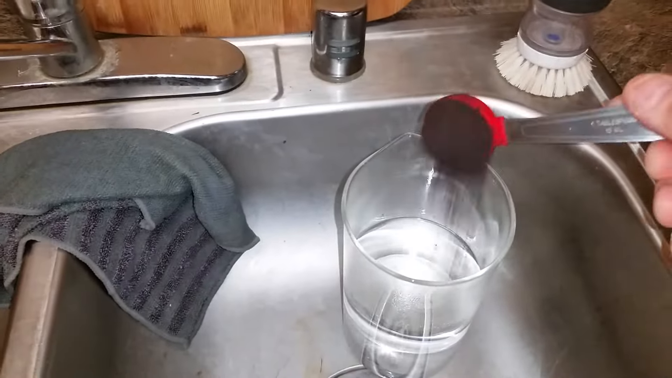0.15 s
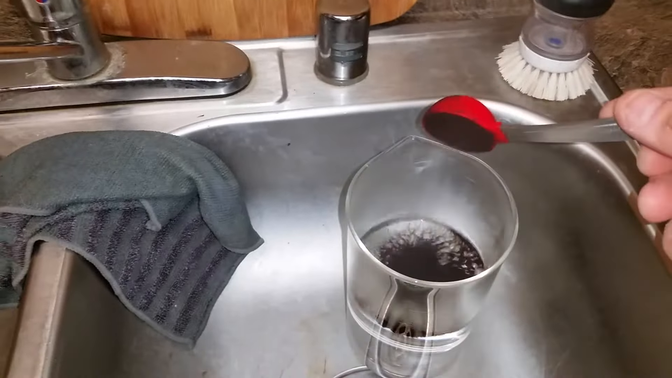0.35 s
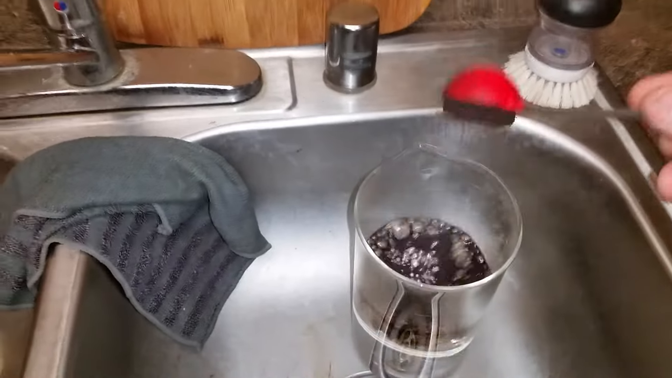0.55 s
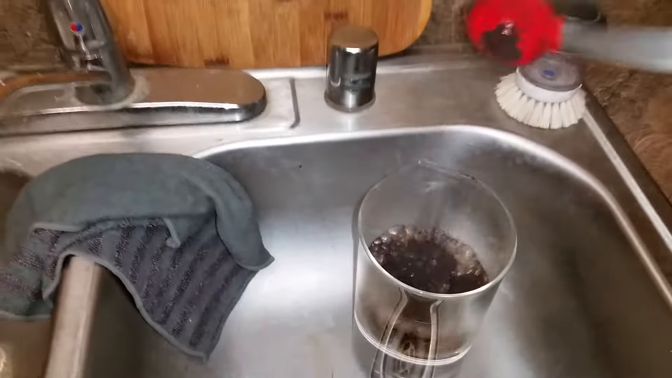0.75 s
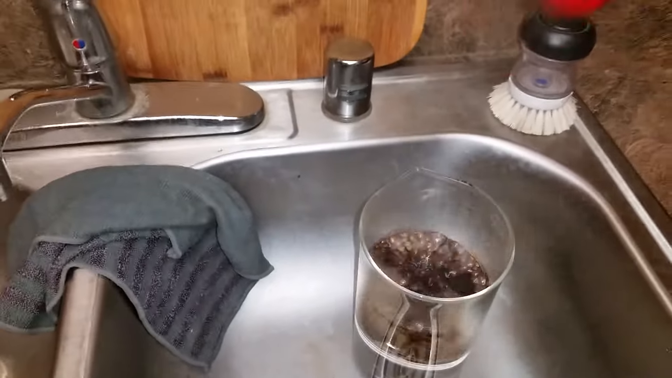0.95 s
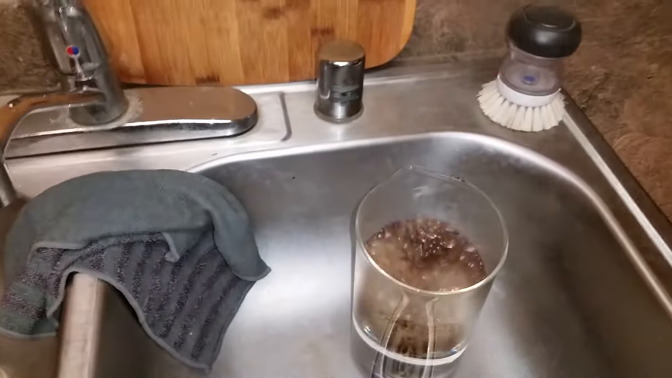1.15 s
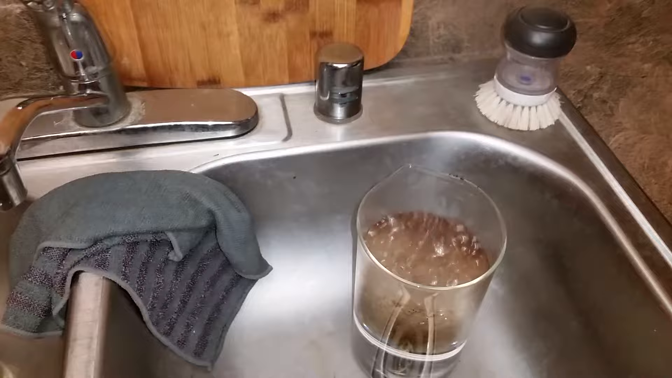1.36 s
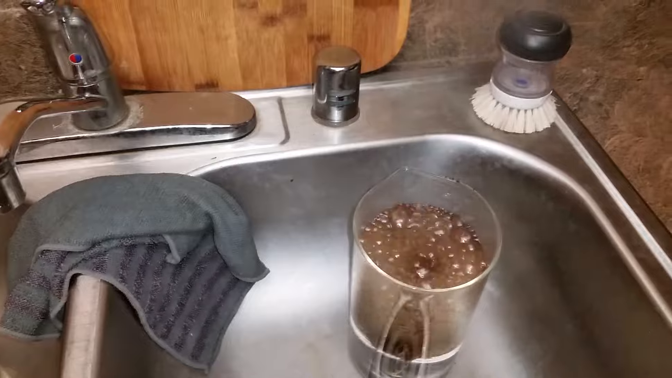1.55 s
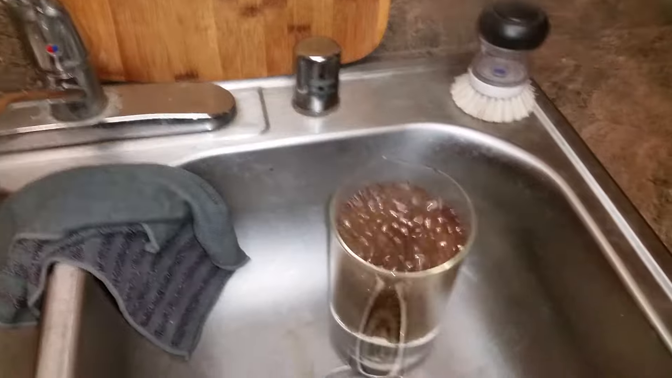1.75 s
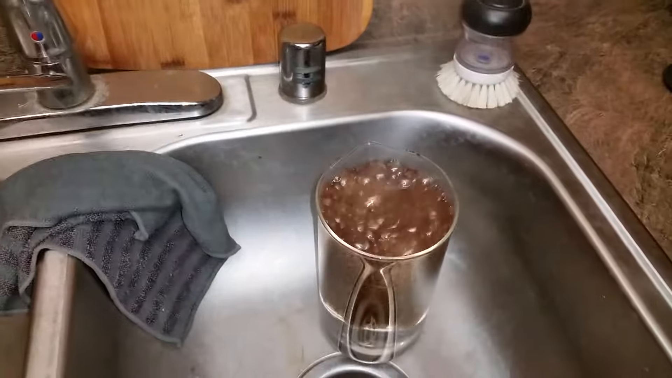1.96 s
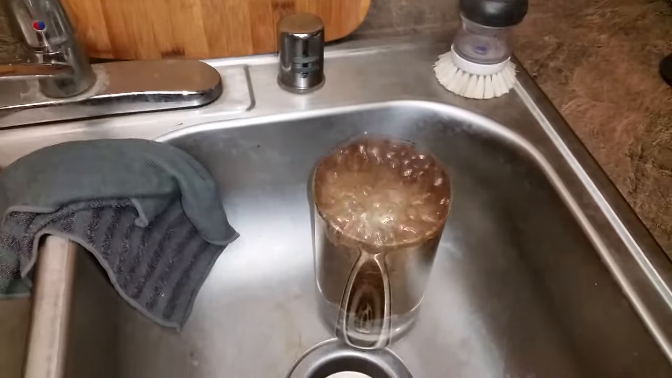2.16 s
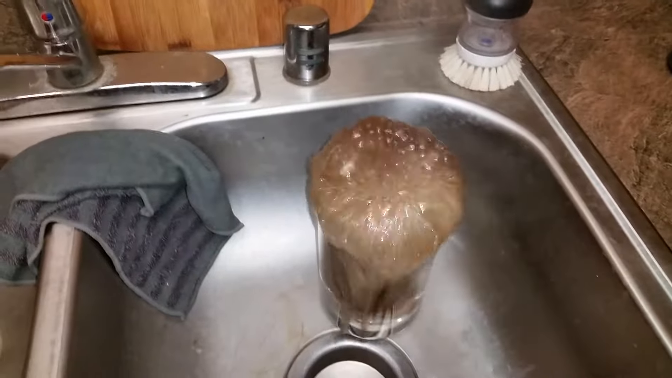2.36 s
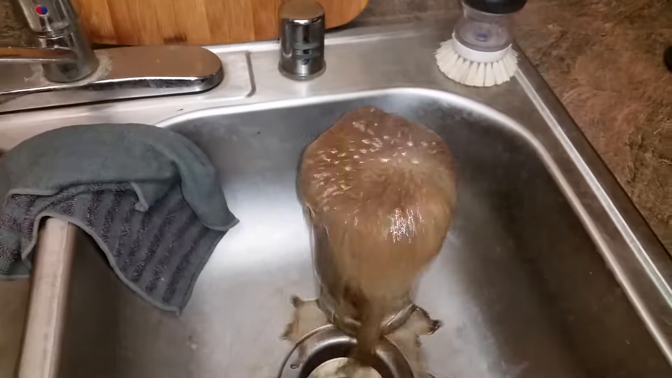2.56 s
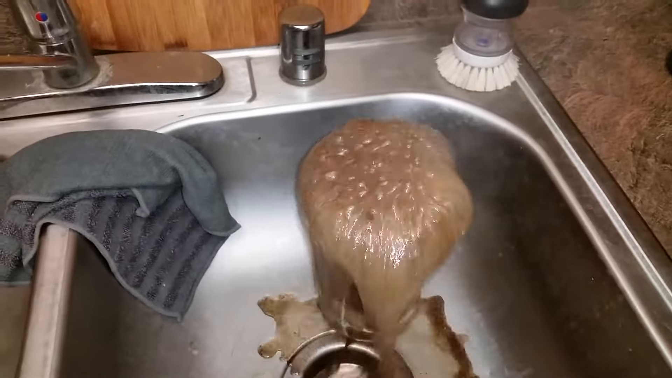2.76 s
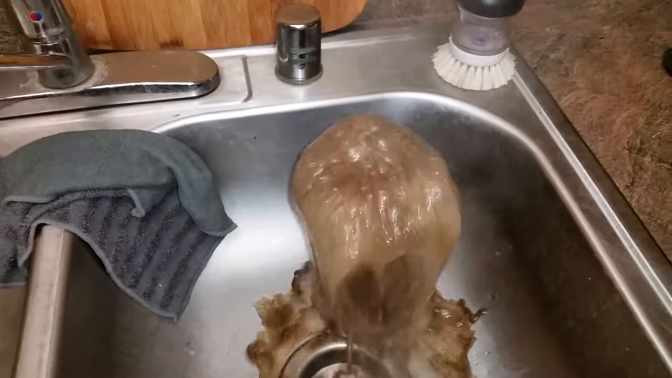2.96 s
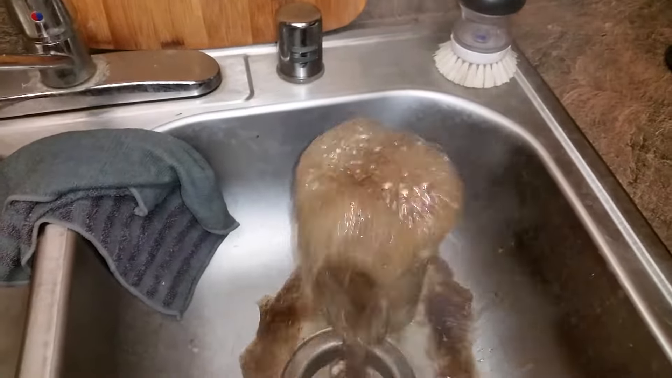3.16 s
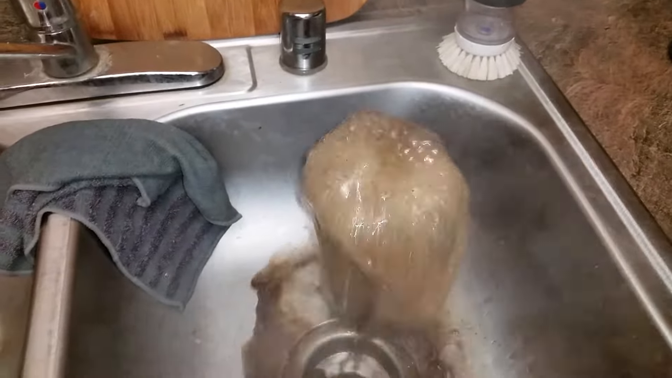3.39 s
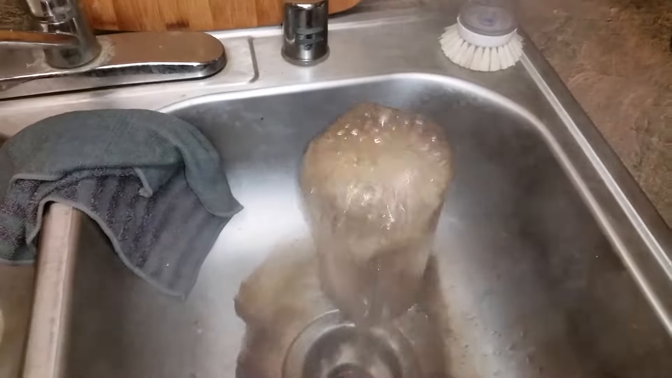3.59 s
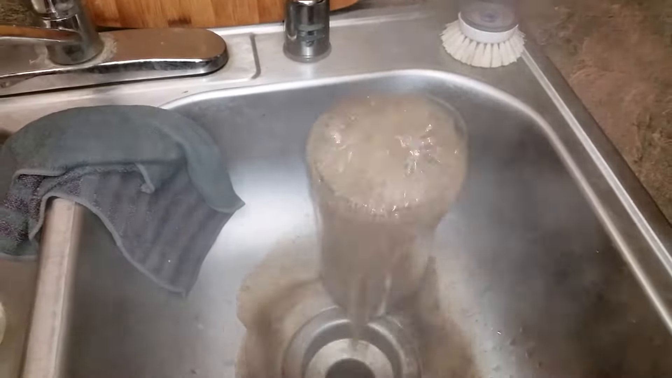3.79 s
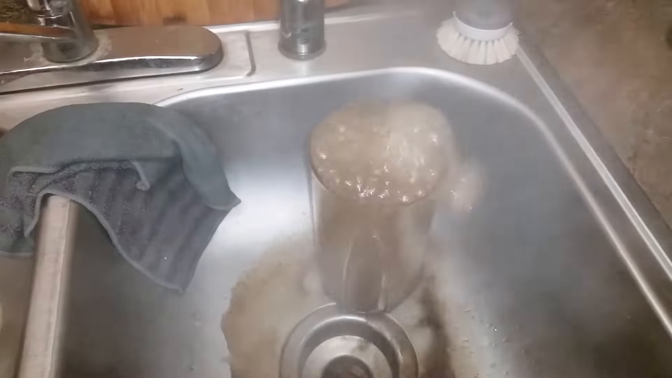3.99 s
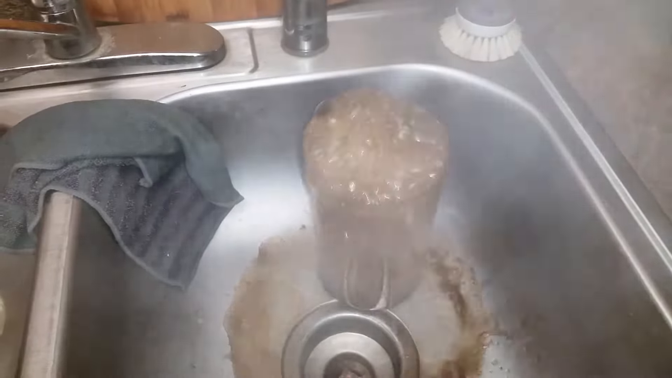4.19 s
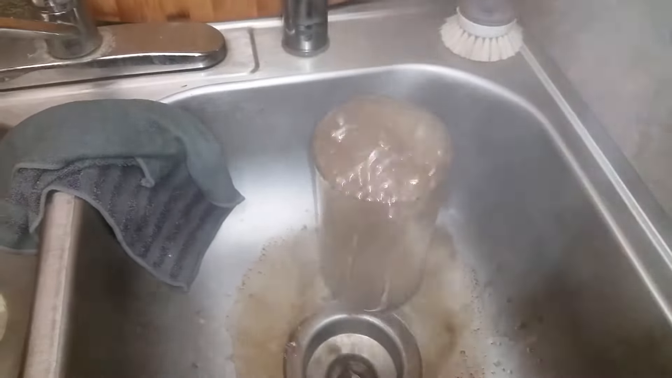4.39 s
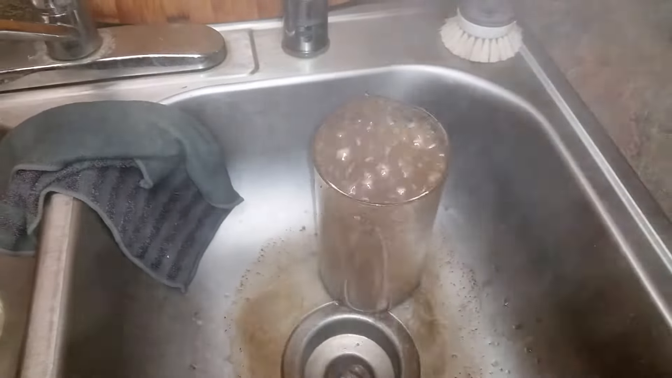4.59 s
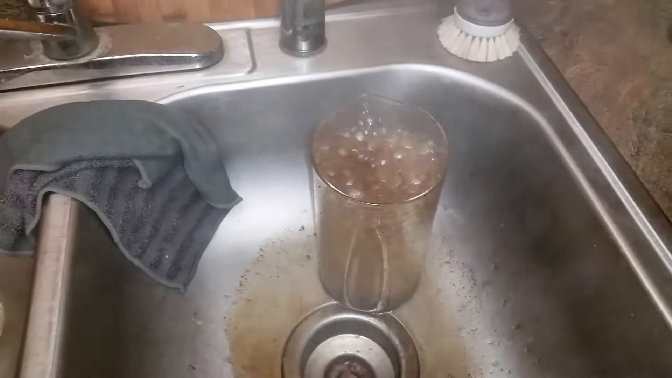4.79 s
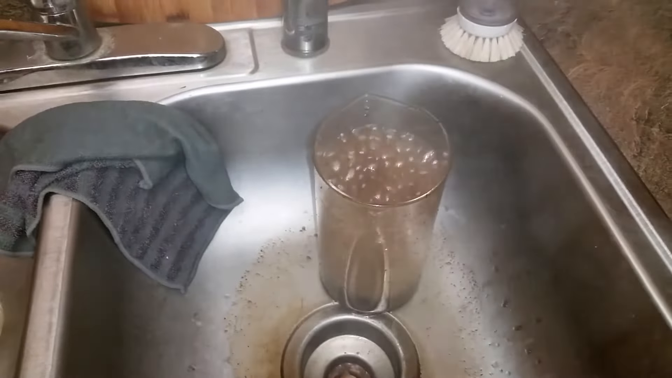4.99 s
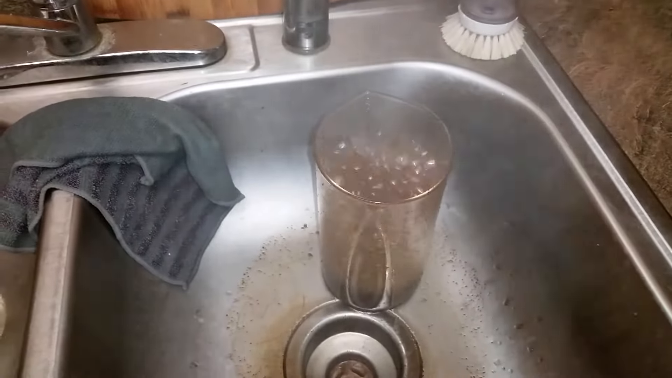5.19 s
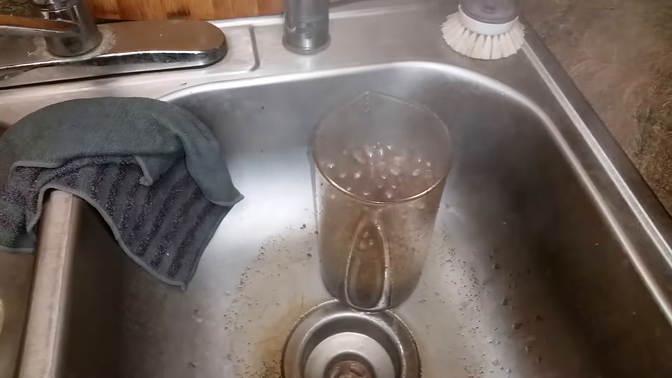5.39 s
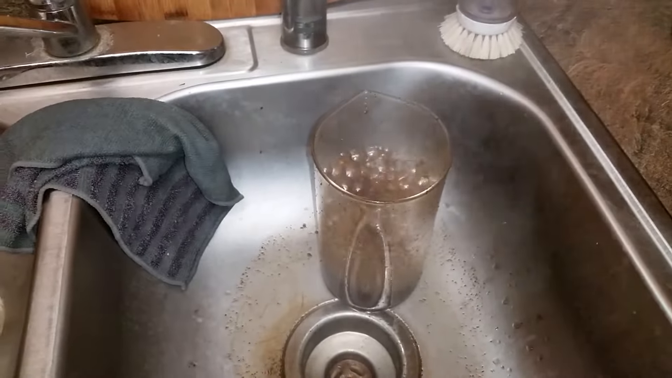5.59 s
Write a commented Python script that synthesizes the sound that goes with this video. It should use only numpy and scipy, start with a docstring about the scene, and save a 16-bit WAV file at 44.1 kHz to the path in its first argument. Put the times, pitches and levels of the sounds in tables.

```python
"""Low room noise, a hum and a thin hiss come first; then instant coffee is tipped into a glass of
superheated water standing in a steel sink. Random bursts seethe under a shrinking air column, foam
over the rim with loud fizz and sharp spits, and excite the modes of the basin. Gliding sines glug;
a few last bumps of vapour ring the modes of the half-empty glass as the boil settles."""
import sys
import numpy as np
from scipy import signal
from scipy.fft import rfft, irfft
from scipy.io import wavfile

SR = 44100
rng = np.random.default_rng(int(sys.argv[2]) if len(sys.argv) > 2 else 0)


def unload_audio(sound):
    """Save the sound as a 16-bit wav file, at the path given as the first command line argument."""
    columns = np.transpose(np.atleast_2d(sound))
    # keep every value between -1 and 1, then stretch to whole-number steps
    steps = np.round(np.clip(columns, -1, 1) * 32767)
    wavfile.write(sys.argv[1], SR, steps.astype(np.int16))


N = 248724
T = np.arange(N) / SR
# powder lands, rest of the spoonful lands, foam tops the rim, water pours on the basin
POWDER_S, LAST_POWDER_S, OVERFLOW_S, POUR_S = 0.39, 0.831, 2.47, 2.682


def undb(db):
    """Decibels to gain."""
    return 10 ** (np.asarray(db) / 20)


def unit(x):
    """Scale so that the centre of the stereo image has a standard deviation of 1."""
    return x / np.std(np.atleast_2d(x).mean(axis=0))


def peak(x, db):
    """Scale to a peak level."""
    return x / np.abs(x).max() * undb(db)


def curves(rows):
    """Each column of a table, after its times, as a value per sample."""
    s, *columns = np.transpose(rows)
    return [np.interp(T, s, c) for c in columns]


def pan(db):
    """Left and right gains for a level difference."""
    return undb(np.array([[0.5], [-0.5]]) * db)


def add(out, s, x):
    """Mix a short sound in at time s."""
    i = max(int(s * SR), 0)
    out[:, i:i + x.shape[-1]] += x[..., :N - i]


def through(x, response):
    """Pass a sound through an impulse response."""
    return signal.fftconvolve(np.atleast_2d(x), np.atleast_2d(response), axes=1)[:, :x.shape[-1]]


def colour(points, size=2048):
    """Causal minimum-phase response with a spectrum of (Hz, dB) points, via the folded cepstrum."""
    hz, db = np.transpose(points)
    f = np.maximum(np.fft.rfftfreq(size, 1 / SR), 1)
    cepstrum = irfft(np.log(undb(np.interp(np.log(f), np.log(hz), db))))
    cepstrum[1:size // 2] *= 2
    cepstrum[size // 2 + 1:] = 0
    return irfft(np.exp(rfft(cepstrum)))


def fade(t60, size=16384):
    """Exponential decay by 60 dB in t60 seconds."""
    return np.exp(-np.log(1000) * T[:size] / t60)


def rise_and_fall(start, attack_s, hold_s, release_t60):
    """Gain that rises quickly at first, holds at 1, then dies away."""
    age = T - start
    rise = np.sqrt(np.clip(age / attack_s, 0, 1))
    return rise * np.exp(-np.log(1000) * np.maximum(age - attack_s - hold_s, 0) / release_t60)


def walk(rate):
    """Random curve with a spread near 1: normal knots at `rate` per second, joined by lines."""
    knots = rng.standard_normal(4096)
    return np.interp(T * rate, np.arange(len(knots)), knots)


def ring(modes, spread, size=16384):
    """Stereo ring of modes; the higher the mode, the more its phase differs between the ears."""
    out = 0
    for k, (hz, t60, db) in enumerate(modes):
        offset = np.array([[0.5], [-0.5]]) * (-1) ** k * min(spread * hz / 1000, 2)
        out = out + undb(db) * fade(t60) * np.cos(2 * np.pi * hz * T[:size] + offset)
    return out


def sink(near_db, near_t60, room_db, room_t60, size=16384):
    """Direct sound, quick reflections off the steel walls, then the kitchen."""
    out = np.zeros((2, size))
    for db, t60 in ((near_db, near_t60), (room_db, room_t60)):
        tail = rng.standard_normal((2, size)) * fade(t60) * (T[:size] > 0.001)
        out += undb(db) * tail / np.sqrt(np.sum(tail ** 2) / 2)
    out[:, 0] += 1
    return out


def bursts(rate, scatter_db):
    """Bubbles bursting at random: many small, a few large."""
    chance, size, sign = rng.random(N), rng.exponential(size=N), rng.choice([-1, 1], N)
    return (chance < rate / SR) * sign * undb(scatter_db * np.minimum(size, 5))


def bubble(hz, cycles, glide, swell, size=16384):
    """A bubble swells and rings for some cycles while its pitch glides; its envelope peaks at 1."""
    age = T[:size] * hz / cycles
    age = age[age < 1]
    envelope = np.exp(-np.log(1000) * age) * (1 - np.exp(-age / swell)) ** 2
    return envelope / envelope.max() * np.sin(2 * np.pi * cycles * (age + glide * age ** 2))


def pings(rate, count=8):
    """Pinhead bubbles tick one by one, each size at its own high pitch."""
    out = np.zeros((2, N))
    for hz in np.geomspace(8800, 15000, count):
        tick = np.sin(2 * np.pi * hz * T[:512]) * fade(t60=0.0025, size=512)
        for when, side, size in rng.random((int(rate * T[-1] / count), 3)):
            strength = undb(9.3 * min(-np.log(1 - size), 3.5))
            add(out, when * T[-1], tick * strength * pan(16 * (side - 0.5)))
    return unit(out)


# colour of the fizz: pitch_hz, level_db
FIZZ_COLOUR = [(2000, -33.5), (4500, -39), (6000, -67.5), (7000, -24.5), (8000, -16.5), (9200, -6.5),
               (10800, -1.5), (12000, -2), (14000, -7.5), (15800, -10.5)]
THIN_FOAM_DB, LONE_SNAP_DB = -63, -3.5  # single snaps weaken once the fizz is thicker than this


def foam(db, froth):
    """Tiny films snap all over the head: an even sizzle at first, coarse crackle once it spills."""
    flurry = undb(7.2 * froth * walk(130))
    left, right, centre = (bursts(rate=1500, scatter_db=4.4) for _ in range(3))
    snaps = unit(np.array([left, right]) + 0.3 * centre)
    sizzle = unit(rng.standard_normal((2, N)))
    coarse = np.clip(0.5 * froth + 0.43, 0, 1)
    clicks = (np.sqrt(coarse) * snaps + np.sqrt(1 - coarse) * sizzle) * flurry
    lone_gain = undb(LONE_SNAP_DB - 0.18 * np.maximum(db - THIN_FOAM_DB, 0))
    clicks = clicks + lone_gain * froth * pings(rate=260)
    walls = sink(near_db=-7.5, near_t60=0.033, room_db=-2.5, room_t60=0.85)
    return unit(through(through(clicks, colour(FIZZ_COLOUR)), walls)) * undb(db + 4.0)


# colour of watery crackle: pitch_hz, level_db
SEETHE_COLOUR = [(150, -20), (450, -4), (900, 0.5), (1270, 0), (1600, -0.5), (1870, 4), (2400, 1.5),
                 (3250, 7), (3750, 0), (4600, 4), (5500, -2), (6500, -10.5), (8000, -52.5), (16000, -43.5)]


def wet_steel(x):
    """Watery crackle echoing between the walls of the basin."""
    walls = sink(near_db=-1.5, near_t60=0.053, room_db=-24.5, room_t60=0.65)
    return through(through(x, colour(SEETHE_COLOUR)), walls)


# modes of the ringing steel: pitch_hz, t60_s, level_db
STEEL_MODES = [(1084, 0.13, -3), (1402, 0.061, 3), (1524, 0.071, 7), (1835, 0.078, -10.5),
               (2090, 0.027, -13), (2720, .05, -8.5), (3460, 0.023, 18)]


def seething(db, froth, count=6):
    """Bubbles of each size crackle in their own surges; as the froth coarsens, the steel rings along."""
    clicks, surge = 0, 1.4 * walk(45)
    for hz in np.geomspace(500, 5000, count):
        left, right, centre = (bursts(rate=1500, scatter_db=4.0) for _ in range(3))
        band = colour([(hz / 2, -26), (hz / 1.2, 0), (hz * 1.2, 0), (hz * 2, -26)])
        sized = through(np.array([left, right]) + np.sqrt(1300 / hz) * centre, band)
        clicks = clicks + sized * undb(froth * (surge + 4.2 * walk(32)))
    steel = unit(through(clicks, ring(STEEL_MODES, spread=0.66)))
    return unit(wet_steel(clicks)) * undb(db + 1.98) + steel * froth * undb(db - 7.5)


AIR_M, LEAST_AIR_M, FOAM_RISE_M_S = 0.112, 0.072, 0.034
SLOSH_SHARE = 0.04  # spread of the pitch wander
COLUMN_DB, FLARE_DB = -56.5, -47


def air_column():
    """Boiling hums in a quarter-wave pipe of air that shortens as foam rises, past sink resonances."""
    air_m = np.maximum(AIR_M - FOAM_RISE_M_S * (T - POWDER_S), LEAST_AIR_M)
    hz = 343 / (4 * air_m) * (1 + SLOSH_SHARE * walk(70))
    crackle = 0.35 * rng.standard_normal((2, N)) + unit(bursts(rate=9000, scatter_db=2.0))
    band = through(crackle, fade(t60=0.0029) * T[:16384] ** 2)
    tone = (band * np.exp(2j * np.pi * np.cumsum(hz) / SR)).real  # lowpassed crackle shifted to hz
    tone = through(tone, colour([
        (450, -14.5), (610, -22), (720, 3.5), (820, 5.5), (960, -1.5), (1080, -0.5),
        (1260, 2.5), (1420, -12), (1700, 0), (1860, 18), (2100, -7.5)]))
    # the water and glass throb below
    body = through(crackle, colour([(150, -27), (250, 0), (345, 3.5), (450, -10.5), (800, -62)]))
    boil = undb(COLUMN_DB) * rise_and_fall(POWDER_S, attack_s=0.23, hold_s=0.58, release_t60=2.34)
    flare = rise_and_fall(LAST_POWDER_S, attack_s=0.005, hold_s=0.008, release_t60=0.14)
    hum = unit(tone) * undb(0.81 * walk(35)) + undb(-5.0) * unit(body)
    return hum * (boil + undb(FLARE_DB) * flare)


SPILL_DB = -44.5
LANDING_LAG_S = 0.06  # fall of the foam from rim to basin


def spill():
    """The first sheet of foam rushes over the rim and patters on the dry steel."""
    patter = np.array([bursts(rate=1800, scatter_db=2.5) for _ in range(2)])
    patter = patter + bursts(rate=1500, scatter_db=5.0)
    rush = through(patter * undb(1.1 * walk(60)), colour([
        (400, -5.5), (600, -8.5), (850, -8), (1070, 5), (1250, -6.5), (1480, 10),
        (1750, -7.5), (2200, -3.5), (3350, -3), (4200, -10.5), (5200, -9.5), (8000, -29)]))
    gain = rise_and_fall(OVERFLOW_S + LANDING_LAG_S, attack_s=0.18, hold_s=0.22, release_t60=0.88)
    return unit(wet_steel(rush)) * undb(SPILL_DB) * gain


# droplets spitting out of the foam, before trims: start_s, level_db, left_minus_right_db
SPIT_EVENTS = [(2.5047, -14.5, 1.0), (2.5413, -31, 2.0), (2.7222, -22, 2.0), (2.7401, -22, 3.0),
               (2.783, -18, 3.5), (2.8015, -17, 4.0), (3.0568, -22, 1.5), (3.0704, -17, 1.5),
               (3.1007, -21, 1.5), (3.1258, -13, 6.5), (3.244, -19, 2.5), (3.3692, -15, 4.5),
               (3.4535, -16, 4.5), (3.466, -14, 1.5), (3.481, -18, 3.0), (3.4994, -14, 5.5),
               (3.6585, -22, 4.0), (3.6716, -18, 4.5), (3.7923, -17, 2.0), (3.8014, -23, -1.0),
               (3.8241, -23, 2.5), (3.8417, -11, 2.5), (3.8646, -18, 2.0), (3.924, -16, 4.0),
               (3.9604, -16, 5.0), (4.0322, -20, 0.5), (4.0782, -24, 4.5), (4.1121, -30, -.5),
               (4.1989, -13.5, 3.5), (4.3116, -33, -.5), (4.3904, -31, 1.5), (4.4383, -28.5, 1.5),
               (4.4593, -27, 3), (4.5164, -24, 2.0), (4.6404, -22, 3.0), (4.8868, -37, -2.0)]


def spits(size=8192):
    """A hot droplet snaps for a millisecond and echoes in the sink."""
    out, t = np.zeros((2, N)), T[:size]
    for s, db, pan_db in SPIT_EVENTS:
        hz = rng.uniform(9800, 13000)
        snap = np.sin(2 * np.pi * hz * t) * fade(t60=0.0013, size=size)
        snap = snap + 0.54 * rng.standard_normal((2, size)) * fade(t60=0.004, size=size)
        snap = snap * (1 - np.exp(-t / 0.000067))  # the film takes a moment to tear
        snap = through(snap, colour([
            (1500, -34), (4500, -14.5), (7000, -12), (8200, -8.0),
            (9800, 1.5), (15000, -4), (17000, -19.0)]))
        snap = through(snap, sink(near_db=-7, near_t60=0.05, room_db=-16, room_t60=0.27))
        snap = snap / np.abs(snap).max(axis=1, keepdims=True)
        add(out, s + 0.001, snap * undb(db + 1) * pan(pan_db - 0.5))
    return out


# slaps: powder bursting into the water, then spilled water on steel: start_s, peak_db, centre_hz, t60_s
SLAP_EVENTS = [(0.36, -58, 1900, 0.21), (0.84, -39.5, 1700, 0.054), (2.535, -39, 1350, 0.35),
               (2.635, -37.5, 1300, 0.47), (2.772, -27.5, 1080, 0.77), (2.846, -24.5, 1390, 0.25),
               (2.999, -30.5, 1535, 0.078), (3.034, -26.5, 1980, 0.28), (3.243, -33, 1200, 0.02),
               (3.278, -22.5, 1290, 0.13), (3.335, -37, 553, 0.17), (3.452, -24, 2270, 0.22),
               (3.501, -28, 785, 0.073), (3.604, -25, 1410, 0.1), (3.671, -25, 1250, 0.15),
               (3.747, -32.5, 1420, 0.15), (3.811, -27.5, 905, 0.068), (3.886, -26.5, 1290, 0.12),
               (3.928, -28.5, 1450, 0.073), (4.051, -31.5, 2980, 0.052), (4.135, -35, 1600, 0.061),
               (4.197, -33, 1450, 0.096), (4.271, -33.5, 1140, 0.16), (4.376, -38, 2040, 0.16),
               (4.408, -32, 2960, 0.2), (4.487, -30.5, 3200, 0.14)]


def slaps():
    """Powder bursts into the water, later spilled water hits steel: click sprays, each at its own pitch."""
    out = np.zeros((2, N))
    for s, db, hz, t60 in SLAP_EVENTS:
        spray = 0.18 * rng.standard_normal(16384) + bursts(rate=2300, scatter_db=4.0)[:16384]
        spray = spray * fade(t60)
        slap = wet_steel(through(spray, colour([(hz / 3, -14), (hz, 0), (hz * 3, -14)])))
        slap = slap + undb(-53.5) * through(slap, ring(STEEL_MODES, spread=0.49))
        add(out, s, peak(slap, db))
    return out


SPATTER_DB = -11.5  # relative to the seething drive


def spatter(db):
    """Loose drops and the largest films crack one by one above the seething."""
    left, right, centre = (bursts(rate=100, scatter_db=4.5) for _ in range(3))
    cracks = through(np.array([left, right]) + 0.38 * centre, colour([
        (500, -14.5), (1400, 6.5), (2200, 0.0), (3300, -6), (3700, -8.5),
        (4500, 10), (5300, 3.0), (6500, -49.0), (9000, -22)]))
    walls = sink(near_db=-4, near_t60=0.025, room_db=-30.5, room_t60=0.25)
    return unit(through(cracks, walls)) * undb(db + SPATTER_DB)


# single fat drops landing: start_s, peak_db, centre_hz
DROP_EVENTS = [(2.519, -38, 3040), (2.616, -35.5, 4080), (2.737, -39, 4030), (2.882, -37, 2600),
               (2.971, -29, 3870), (3.278, -26, 3440), (3.791, -26, 1060), (3.916, -26, 4200),
               (3.916, -33.5, 1600), (3.961, -32.5, 3000), (4.028, -53, 3200), (4.051, -28, 2770),
               (4.489, -53, 1530), (4.751, -43, 3180), (4.85, -46, 3200), (5.046, -56, 4400)]


def drops():
    """A single fat drop cracks on the wet steel."""
    out = np.zeros((2, N))
    for s, db, hz in DROP_EVENTS:
        walls = sink(near_db=7.5, near_t60=0.036, room_db=-14.0, room_t60=0.12)
        band = colour([(hz / 3, -20), (hz, 0), (hz * 1.05, 0), (hz * 2, -26), (hz * 4, -45)])
        add(out, s, peak(through(walls, band), db))
    return out


# large gulping bubbles, before shudder and echo: start_s, level_db, pitch_hz, glide_share (mean shift)
GLUG_EVENTS = [(0.359, -48.5, 780, -0.043), (2.861, -26.5, 136.7, 0.11), (3.001, -27, 126, 0.098),
               (3.277, -27, 133, 0.099), (3.297, -46, 620, 0.075), (3.332, -32, 260, 0.07),
               (3.332, -39, 560, 0.17), (3.349, -41.5, 386, 0.076), (3.362, -35.5, 620, -0.16),
               (3.431, -29.5, 133, -0.0053), (3.465, -33.5, 203, 0.11), (3.48, -27, 1072, 0.00034),
               (3.489, -29, 135, -0.03), (3.515, -32.5, 246, -0.024), (3.522, -39, 568, 0.0092),
               (3.532, -39, 670, -0.045), (3.591, -36, 517, 0.018), (3.604, -44, 798, -0.068),
               (3.637, -36, 1760, -0.036), (3.646, -24.5, 131.4, 0.15), (3.668, -36, 1070, 0.084),
               (3.686, -33.5, 1730, -0.00018), (3.703, -44, 492, -0.053), (3.708, -34, 1493, .03),
               (3.719, -39, 376, .2), (3.75, -33.5, 1520, 0.01), (3.757, -28, 143.4, -0.026),
               (3.764, -32.5, 240, 0.011), (3.796, -50, 330, -0.12), (3.887, -24.5, 129, 0.11),
               (3.891, -43.5, 418, -0.061), (3.969, -36, 199, -0.27), (3.978, -25.5, 137.6, 0.071),
               (4.041, -37, 260, 0.19), (4.079, -33, 349, 0.13), (4.096, -40, 500, 0.15),
               (4.13, -40, 450, 0.035), (4.205, -33, 251, -0.0008), (4.265, -39.5, 523, -0.095),
               (4.302, -53, 420, 0.055), (4.327, -36, 518, -0.03)]


def glugs():
    """Big vapour pockets gulp through the foam and shudder; the smaller ones ring for more cycles."""
    out = np.zeros((2, N))
    for s, db, hz, glide in GLUG_EVENTS:
        gulp = bubble(hz, cycles=18 * (hz / 130) ** 0.61, glide=glide, swell=0.084 * 130 / hz)
        shudder = undb(2.5 * walk(hz / 7)[:len(gulp)])
        add(out, s, undb(db) * gulp * shudder)
    return through(out, sink(near_db=-19, near_t60=0.054, room_db=-8.5, room_t60=0.62))


def gurgle(db, froth, count=3000):
    """Small bubbles and drops chirp in the overflow; the coarser the froth, the larger they get."""
    out = np.zeros((2, N))
    for when, pitch, size, length, side in rng.random((count, 5)):
        pitch = 1 - (1 - pitch) * (0.5 + 0.5 * froth[int(when * N)])
        cycles = (7 + 14 * length) * 3 ** pitch
        chirp = bubble(hz=205 * 20.5 ** pitch, cycles=cycles, glide=0.065, swell=0.021)
        strength = undb(5.4 * min(-np.log(1 - size), 3.5) - 8 * pitch)  # big bubbles are louder
        add(out, when * T[-1], chirp * strength * pan(14 * pitch * (side - 0.5)))
    wet = through(out, sink(near_db=10.0, near_t60=0.021, room_db=-37.5, room_t60=0.3))
    return unit(wet) * np.sqrt(froth) * undb(db - 8)


# bubbles tumbling in the spilled water, later in the half-empty glass, before trim: start_s, level_db
TUMBLE_LEVELS = [(2.5, -73), (2.6, -62), (2.78, -54), (2.87, -38), (2.96, -50), (3.05, -56), (3.2, -71),
                 (3.34, -43), (3.42, -41.5), (3.52, -54), (3.66, -52), (3.8, -45), (4.0, -48), (4.12, -48),
                 (4.29, -42), (4.4, -60), (4.75, -60), (5.12, -50.5), (5.25, -59), (5.5, -80.5)]


def tumbling(count=4000):
    """A crowd of blunt, pea-sized bubbles overlaps in quick gushes; each dies within some cycles."""
    out = np.zeros((2, N))
    for when, pitch, size, length, side in rng.random((count, 5)):
        cycles = (6 + 10 * length) * 2 ** pitch
        blub = bubble(hz=230 * 5.5 ** pitch, cycles=cycles, glide=0.14, swell=0.044)
        strength = undb(3.2 * min(-np.log(1 - size), 3.5) - 5.0 * pitch)
        add(out, when * T[-1], blub * strength * pan(6 * (side - 0.5)))
    walls = sink(near_db=-6, near_t60=0.028, room_db=-18, room_t60=0.3)
    wet = through(out * undb(2.9 * walk(42)), walls)
    return unit(wet) * undb(curves(TUMBLE_LEVELS)[0] - 5.5)


# modes of the sink and the air in it: pitch_hz, t60_s, level_db
BASIN_MODES = [(68.4, 0.055, -29), (90.8, 0.11, 2), (121.9, 0.25, 2.5), (138.7, 0.1, 9), (168, 0.13, -1),
               (222, 0.15, 3.5), (248.9, 0.11, 6.5), (349, 0.23, 3), (512, 0.12, 0), (704, 0.032, 9),
               (803, 0.11, 5), (1080, 0.2, 4)]


def rumble(db):
    """Churning water drums on the basin through the foot of the glass."""
    knocks = bursts(rate=540, scatter_db=2.0) * undb(2.25 * walk(25.08))
    drum = through(knocks, ring(BASIN_MODES, spread=2.8))
    drum = through(drum, colour([(30, -5.5), (90, 3.0), (1500, -13.5), (4000, -29.5)]))
    return unit(drum) * undb(db - 4.0)


# powder landing, then vapour bumps and gushes that shake the basin: start_s, peak_db, brightness_db
BUMP_EVENTS = [(0.359, -42.5, 8), (.833, -30, -3), (.844, -28, 18), (1.801, -50, -26), (2.831, -30.5, 13),
               (3.041, -34.5, 2), (3.127, -39, -25.5), (3.326, -27.5, 27.5), (3.449, -25.5, 14),
               (3.522, -41.5, 8), (3.58, -27, 5), (3.765, -39, 1), (3.79, -22.5, 27), (3.88, -23, 12),
               (3.973, -30, 10.5), (4.196, -34, 3.5), (4.269, -29.5, 12)]


def bumps():
    """Each blow pushes the basin once and rattles on; sharper ones drive the higher modes more."""
    out = np.zeros((2, N))
    for s, db, bright_db in BUMP_EVENTS:
        modes = [(hz * (1 + 0.0062 * rng.standard_normal()), t60,
                  mode_db + bright_db * np.clip(np.log(hz / 140), 0, 1))
                 for hz, t60, mode_db in BASIN_MODES]
        push = 0.048 * rng.standard_normal(16384) * fade(t60=0.022)  # the rattle after the blow
        push[0] += 1
        thud = through(through(push, ring(modes, spread=0.96)), colour([
            (30, -7.5), (65, 15.5), (105, 21.5), (1200, -12.0), (3000, -21.0), (8000, -39.5)]))
        add(out, s + 0.00218, peak(thud, db))
    return out


# last vapour bubbles collapsing in the half-empty glass: start_s, peak_db, pitch_hz
PLOP_EVENTS = [(4.487, -34, 510), (4.605, -43, 327), (4.678, -50, 1100), (4.739, -54.5, 250),
               (4.802, -48, 600), (4.868, -41.5, 800), (4.924, -36, 198), (4.986, -43.5, 1280),
               (5.047, -46, 696), (5.098, -37.5, 506), (5.112, -48, 696), (5.153, -27.5, 275),
               (5.32, -54, 450)]
# modes of the half-empty glass: pitch_hz, t60_s, level_db
GLASS_MODES = [(120, 0.092, 3), (195, 0.098, 5), (254, 0.12, 4), (323, 0.17, -4), (516, 0.14, 0.5),
               (752, 0.054, 8), (835, 0.036, -9), (1504, 0.1, 3)]


def plops():
    """Vapour collapses in a short shudder; each pocket rings the glass modes near its own pitch."""
    out = np.zeros((2, N))
    for s, db, hz in PLOP_EVENTS:
        push = 0.16 * rng.standard_normal(16384) * fade(t60=0.07)
        push[0] += 1
        modes = [(f * (1 + 0.019 * rng.standard_normal()), t60, mode_db)
                 for f, t60, mode_db in GLASS_MODES]
        knock = through(push, sink(near_db=4, near_t60=0.015, room_db=-14, room_t60=0.25))
        plop = through(push, ring(modes, spread=0.97)) + undb(23) * knock
        plop = through(plop, colour([(hz / 4, -12), (hz, 0), (hz * 3, -9), (hz * 8, -36)]))
        add(out, s, peak(plop, db))
    return out


# colour of the room noise: pitch_hz, level_db
ROOM_COLOUR = [(25, -17.5), (70, -4.5), (100, -8.5), (122, 1), (160, -21.5), (240, -19.5), (340, -20),
               (430, -30), (600, -33.5), (850, -37), (1300, -77), (3000, -61), (8000, -100)]
# colour of the hiss: pitch_hz, level_db
HISS_COLOUR = [(1500, -17.5), (3000, -10), (3700, -21), (4200, 13.5), (4650, 17.5), (5200, 8), (6200, -19),
               (9000, -72), (16000, -11.5)]


def kitchen():
    """Low room noise, an appliance hum and a narrow steady hiss."""
    low = rng.standard_normal(N) + 2.16 * rng.standard_normal((2, N))
    low = unit(through(low, colour(ROOM_COLOUR, size=8192))) * undb(-58.5)
    hiss = 0.26 * rng.standard_normal(N) + rng.standard_normal((2, N))
    hiss = unit(through(hiss, colour(HISS_COLOUR))) * undb(-76.0) * pan(db=14)
    hum = undb(-70.5) * np.sin(2 * np.pi * 120 * T)
    return low + hiss + hum


# the head of foam heaves: centre_s, half_length_s, lift_db
FOAM_SURGES = [(0.368, 0.0062, 11.5), (0.855, 0.016, 6), (1.192, 0.0031, 8.5), (1.99, 0.0054, 7),
               (2.798, 0.071, 8.5), (2.922, 0.027, 3), (3.28, 0.02, 2), (3.475, 0.025, 7.5),
               (3.63, 0.087, 5.5), (4.067, 0.03, 5.5), (4.221, 0.032, 11), (4.448, 0.13, 14),
               (4.511, 0.012, 5.5), (4.648, 0.015, 3.5), (5.1, 0.1, 12)]
LULL_SHARE, LULL_LEAD_S = 0.64, 0.062  # the boil sags before each heave while vapour gathers


def heaving():
    """Lift of the boil in dB: a lull, then a surge, for every heave of the foam."""
    lift_db = 0
    for s, length, db in FOAM_SURGES:
        surge = np.exp(-((T - s) / length) ** 2)
        lull = np.exp(-((T - s + LULL_LEAD_S) / length) ** 2)
        lift_db = lift_db + db * (surge - LULL_SHARE * lull)
    return lift_db


SHAKE_OVER_SEETHE_DB, SHAKE_MAX_DB, POUR_DB = 10, -46, -35  # drive of the rumble, before its trim


def shaking(seethe_db):
    """Rumble drive in dB: a little from the seething glass, much more while water pours on the basin."""
    glass = undb(np.minimum(seethe_db + SHAKE_OVER_SEETHE_DB, SHAKE_MAX_DB))
    pour = undb(POUR_DB) * rise_and_fall(POUR_S, attack_s=0.88, hold_s=0.69, release_t60=0.63)
    return 20 * np.log10(np.hypot(glass, pour))


# drive of the boil in the glass, before heaves and trims: start_s, foam_db, seethe_db
GLASS_BOIL = [(0.25, -101, -92), (0.4, -69, -77), (0.54, -54.5, -61.5), (0.88, -52, -59.5),
              (1.24, -56.5, -59), (1.73, -71, -66), (2.43, -62, -61.5), (2.49, -54, -61)]
# drive of the boil as it overflows and dies down, likewise: start_s, foam_db, seethe_db
RIM_BOIL = [(2.64, -39, -50.5), (2.71, -39.5, -51), (2.9, -37, -47.5), (3.27, -43, -47.5),
            (3.729, -42.5, -46), (4.55, -56, -57.5), (5.07, -65, -62.5), (5.46, -85.5, -70.5),
            (5.64, -92, -80)]
SEETHE_SURGE_SHARE = 0.56  # how much of a heave reaches the seething below
IDLE_FIZZ_DB = -94  # least foam drive: faint sizzle of the undisturbed hot water
FINE_FROTH = 0.246  # bubble size before the overflow: 0 fine sizzle - 1 bursting froth


def scene():
    """The boil drives the textures and its bubbles coarsen as it overflows; single events ride on top."""
    foam_db, seethe_db = curves(np.vstack([GLASS_BOIL, RIM_BOIL]))
    lift_db = heaving()
    foam_db = np.maximum(foam_db + lift_db - 2.5, IDLE_FIZZ_DB)
    seethe_db = seethe_db + SEETHE_SURGE_SHARE * lift_db - 1.5
    overflow = rise_and_fall(OVERFLOW_S, attack_s=0.876, hold_s=0.7, release_t60=25) ** 2
    froth = np.clip(FINE_FROTH + (1 - FINE_FROTH) * overflow, 0, 1)
    boil = foam(foam_db, froth) + seething(seethe_db, froth) + air_column()
    spray = spill() + spits() + slaps() + spatter(seethe_db) + drops()
    bubbles = glugs() + gurgle(seethe_db + 2.0, froth) + tumbling()
    knocks = rumble(shaking(seethe_db)) + bumps() + plops()
    return boil + spray + bubbles + knocks + kitchen()


# colour difference of the two microphone ports: pitch_hz, left_minus_right_db
PORT_COLOUR = [(100, 0.5), (350, -3.5), (700, 0.5), (1100, -1), (1650, 4), (2400, 1), (3300, 6), (4000, 5),
               (5000, 7), (6000, 2.5), (7500, 0.5), (9200, -7), (11200, 4.5), (12500, 5), (15500, 5.5)]
# gain of the left-right difference, low in the bass as the ports are close: pitch_hz, level_db
STEREO_WIDTH = [(60, -8), (130, -9), (250, -1.5), (600, -5), (1300, -2.5), (4000, 0)]
PORT_TURN_HZ, PORT_TURN_WIDTH_HZ = 3430, 1050  # around here the ports move in opposite phase
TOP_HZ = 15900


def record(dry):
    """Each microphone port adds its own colour and phase; they share the bass; the top is cut."""
    mid = dry.mean(axis=0)
    side = through((dry[0] - dry[1]) / 2, colour(STEREO_WIDTH))[0]
    left, right = mid + side, mid - side
    notch = signal.iirnotch(PORT_TURN_HZ, PORT_TURN_HZ / PORT_TURN_WIDTH_HZ, fs=SR)
    right = 2 * signal.lfilter(*notch, right) - right  # allpass: turns the phase only
    ports = np.array([colour([(hz, share * db) for hz, db in PORT_COLOUR]) for share in (0.5, -0.5)])
    top_cut = signal.ellip(10, 0.2, 70, TOP_HZ, fs=SR, output="sos")
    return signal.sosfilt(top_cut, through(np.array([left, right]), ports))


dry = scene()
out = record(dry)
unload_audio(out)
```